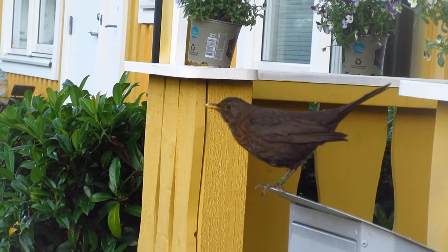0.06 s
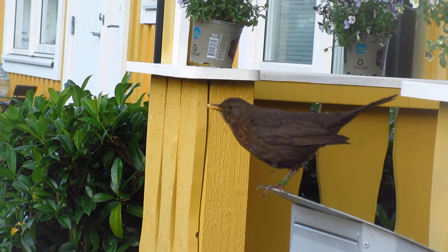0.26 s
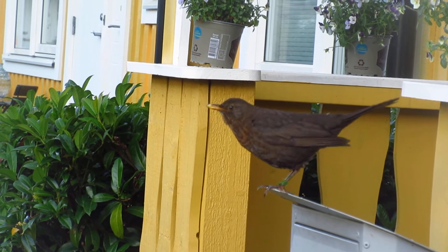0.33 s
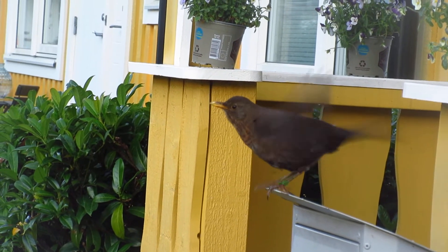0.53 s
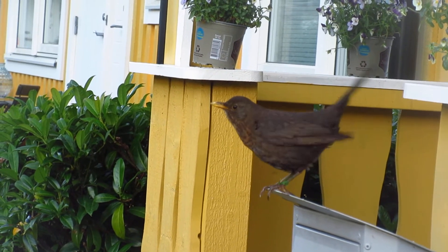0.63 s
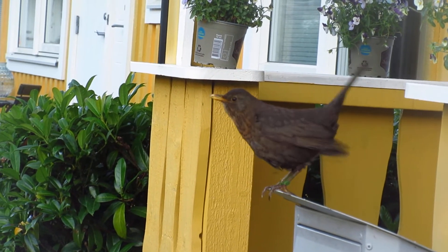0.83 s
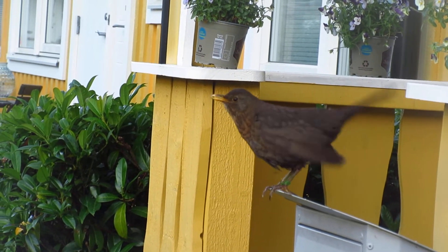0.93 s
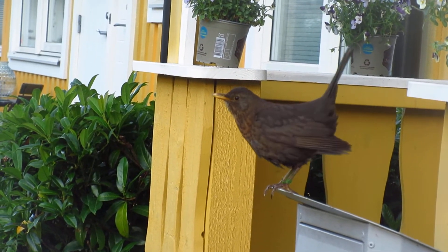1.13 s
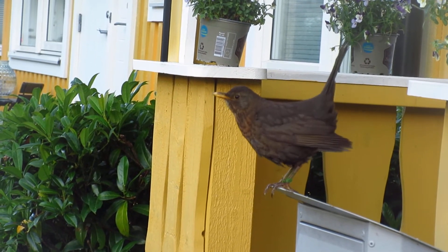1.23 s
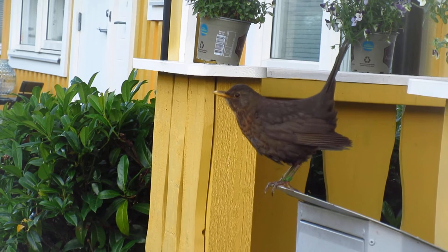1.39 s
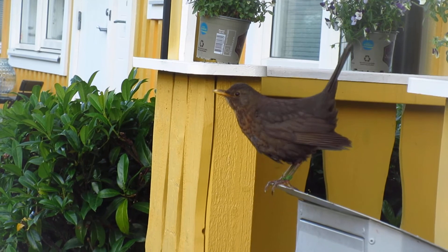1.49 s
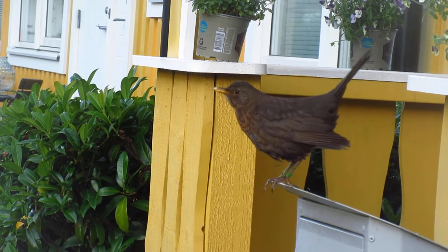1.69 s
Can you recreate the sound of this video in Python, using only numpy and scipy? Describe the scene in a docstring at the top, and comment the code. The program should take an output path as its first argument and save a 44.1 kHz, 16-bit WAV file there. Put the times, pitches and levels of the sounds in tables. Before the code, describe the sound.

A blackbird calls close by over a faint, steady outdoor wash. From about 0.2 to 1.2 seconds it gives nine short, sharp, slightly raspy chucks, loudest near 0.8 seconds, each with a brief echo. A soft, low wing rustle swells beneath them and fades by about 1 second, with a few faint dull bumps scattered through. Near 1.5 seconds a very faint, thin hiss sets in.

```python
"""A faint outdoor wash sounds throughout, and a low rustle swells as a blackbird flicks wings and tail.
From 0.2 s the bird, on a metal box by a wooden porch, gives nine sharp "chuck" calls over dull bumps.
Each is a whistle that flicks up, breaks and plunges with a rasp, all in about 20 ms.
The house front throws it back, then the garden rings on. Near 1.5 s a thin hiss sets in."""
import sys
import numpy as np
from scipy import signal
from scipy.fft import rfft, irfft
from scipy.io import wavfile
from scipy.ndimage import uniform_filter1d

SR = 44100
rng = np.random.default_rng(int(sys.argv[2]) if len(sys.argv) > 2 else 0)


def master_out(mix):
    """Clip the mix to full scale and print it as 16-bit PCM to the path in sys.argv[1]."""
    frames = np.transpose(np.atleast_2d(mix))
    ceiling = np.clip(frames, -1, 1)
    pcm = np.round(ceiling * 32767).astype(np.int16)
    wavfile.write(sys.argv[1], SR, pcm)


N = 77175


def amp(db):
    """The decibel scale: 20 dB is a factor of ten in amplitude."""
    return 10 ** (np.asarray(db) / 20)


def unit(x):
    """Normalisation to an rms of 1."""
    return x / np.sqrt(np.mean(x ** 2) + 1e-20)


def gain_db(spectrum, hz):
    """Interpolation of a frequency response on a logarithmic frequency axis."""
    knots_hz, db = np.transpose(spectrum)
    return np.interp(np.log(hz + 1), np.log(knots_hz + 1), db)


def colour(x, spectrum):
    """Linear filtering: each frequency component is scaled by its own gain."""
    return irfft(rfft(x) * amp(gain_db(spectrum, np.fft.rfftfreq(len(x), 1 / SR))), len(x))


def noise(spectrum):
    """Filtered white noise takes on the spectrum of the filter; its rms is 1."""
    return unit(colour(rng.standard_normal(N), spectrum))


def wander(samples):
    """Two moving averages low-pass white noise into smooth random motion of rms 1."""
    smoothed = uniform_filter1d(rng.standard_normal(N), samples, mode="wrap")
    return unit(uniform_filter1d(smoothed, samples, mode="wrap"))


def outdoor_wash():
    """Stationary noise, strongest below 1.8 kHz, forms the ambient floor."""
    # Each row: frequency in Hz, relative spectral density in dB.
    wash_spectrum = [(20, -39), (40, -7), (65, -1.5), (120, -4), (200, -4), (400, -5.5), (550, -8),
                     (750, -7), (1000, -3.5), (1300, -3.5), (1600, 1), (1850, -13.5), (3000, -15),
                     (4200, -19.5), (4800, -18.5), (5600, -19), (10000, -23.5), (12500, -29), (15000, -34)]
    return amp(-51) * noise(wash_spectrum)


def distant_hiss(centre_hz=4830, width_hz=480, start_s=1.466, rise_s=0.066):
    """Noise confined to a narrow Gaussian band is heard as a thin hiss."""
    band = np.exp(-((np.fft.rfftfreq(N, 1 / SR) - centre_hz) / width_hz) ** 2)
    swell = np.clip((np.arange(N) / SR - start_s) / rise_s, 0, 1)
    return amp(-67.5) * swell * unit(irfft(rfft(rng.standard_normal(N)) * band, N))


def wing_rustle():
    """Amplitude-modulated noise: a soft low rustle while the bird flicks its wings and tail."""
    # Each row: time in seconds, level in dB.
    envelope = [(0, -93), (.2, -58), (.4, -52), (.63, -53.5), (.85, -57), (1.1, -73), (1.4, -68),
                (1.75, -69)]
    # Each row: frequency in Hz, relative spectral density in dB.
    rustle_spectrum = [(30, -31), (90, 6), (150, 8.5), (250, 5.5), (400, 7.5), (600, -11), (1500, 4),
                       (8000, -28)]
    level_db = np.interp(np.arange(N) / SR, *np.transpose(envelope))
    return amp(level_db) * noise(rustle_spectrum)


def dull_bumps(width_s=0.028):
    """Low, wavering tones under Gaussian envelopes have no sharp onset, so they sound dull."""
    # Each row: time of the peak in seconds, mean frequency in Hz, peak level in dB.
    bumps = [(.39, 120.2, -55), (.635, 151, -50.5), (1.042, 129, -50.5), (1.55, 118, -54.5)]
    t = np.arange(N) / SR
    sound = np.zeros(N)
    for peak_s, hz, db in bumps:
        phase = 2 * np.pi * np.cumsum(hz * (1 + 0.114 * wander(samples=400))) / SR
        sound += amp(db) * np.exp(-((t - peak_s) / width_s) ** 2) * np.sin(phase)
    return sound


def echo(delay_s, db):
    """Specular reflection: one delayed impulse, placed between samples by a windowed sinc."""
    offset = np.arange(N) - delay_s * SR
    return amp(db) * np.sinc(offset) * np.exp(-(offset / 10) ** 2)


def blurred_echo(delay_s, db, t60_s=0.024):
    """Scattering spreads a reflection into a short, decaying burst of noise."""
    t = np.arange(N) / SR
    blur = rng.standard_normal(N) * (t > delay_s) * amp(-60 * abs(t - delay_s) / t60_s)
    return amp(db) * blur / np.linalg.norm(blur)


def diffuse_tail(t60_s, delay_s):
    """Reverberation: dense random reflections of energy 1 build after a delay and decay exponentially."""
    t = np.arange(N) / SR
    build_up = np.clip(t / delay_s - 1, 0, 1)
    taps = rng.standard_normal(N) * amp(-60 * t / t60_s) * build_up
    return taps / np.linalg.norm(taps)


def surroundings(source):
    """Convolution with the impulse response of perch, porch, walls and garden gives the reflections."""
    # Crisp echoes off hard walls. Each row: delay in seconds, gain in dB before colouring.
    sharp_echoes = [(.00607, -10.5), (.00941, -6), (.01027, -18.5), (.0156, -12.5), (.01802, -16),
                    (.0279, -15), (.0345, -17), (.0660, -19.5)]
    # Smeared echoes off hedges and rough surfaces. Each row: delay in seconds, gain in dB before colouring.
    blurred_echoes = [(.021, -10), (.043, -30), (0.0626, -20.5)]
    # Colour of all reflections after the first. Each row: frequency in Hz, gain in dB.
    reflection_colour = [(1000, -14.5), (1550, 2), (1850, -7.5), (2100, 1.5), (2330, 1.5), (2550, -0.5),
                         (2800, -4), (3100, -1.5), (5000, -7), (15000, -3.5)]
    # Added colour of the long tail. Each row: frequency in Hz, gain in dB.
    tail_colour = [(1000, -1), (1550, -1), (2050, -5), (2450, 1.5), (2700, 3), (3100, -1), (6000, -3)]
    garden = amp(-12.5) * colour(diffuse_tail(t60_s=0.42, delay_s=0.028), tail_colour)
    porch = amp(-12) * diffuse_tail(t60_s=0.089, delay_s=0.0034)
    sharp = sum(echo(*row) for row in sharp_echoes)
    blurred = sum(blurred_echo(*row) for row in blurred_echoes)
    perch = echo(delay_s=0.002528, db=-5.5)  # the nearest surface doubles every call
    response = perch + colour(garden + porch + sharp + blurred, reflection_colour)
    return signal.fftconvolve(source, response)[:N]


def chuck(top_s, top_hz, db, rise, fall, plunge_s, edge_db):
    """Source and filter: the beak shapes a swept whistle, the throat colours its overtones and rasp."""
    # Response of the beak. Each row: frequency in Hz, gain in dB.
    beak = [(700, -33), (1100, -26), (1500, -12.5), (1900, -8.5), (2350, -2.5), (2900, -6.5), (3400, -11.5)]
    # Overtones of the whistle. Each row: harmonic number, relative level in dB before the throat.
    harmonics = [(2, -29.5), (3, -26), (4, -21.5), (5, -35), (6, -37)]
    # Resonances of the throat. Each row: frequency in Hz, gain in dB.
    throat = [(500, -51), (1500, -11), (2100, 17), (2550, 20), (3000, 6.5), (3500, 3), (3900, 3), (4400, 0),
              (5500, -5.5), (6700, -10.5), (7600, -10), (8700, -27), (9700, -17), (10150, -9.5),
              (10900, -20), (12200, -12.5), (13300, -11), (15000, -13.5)]
    lead_s, attack_s, swell_s, release_s = 0.0092, 0.0004, 0.0042, 0.0053
    break_s, leap_s, landing_hz = 0.0012, 0.00091, 1086
    overtone_rise_s, rasp_rise_s, rasp_decay_s = 0.0057, 0.0018, 0.014
    t = np.arange(N) / SR - top_s  # zero at the top of the sweep, where the note breaks
    live = (t > -lead_s) & (t < plunge_s + release_s)
    t = t[live]

    # The pitch rises cleanly, shudders and overshoots at the break, then falls roughly.
    octaves = np.where(t < 0, rise * t, -fall * t)
    shudder = np.where(t < 0, 0.0031, 0.027) + 0.043 * np.exp(-(t / break_s) ** 2)
    jitter = shudder * wander(samples=14)[live]
    leap = 0.084 * np.exp(-(t / leap_s) ** 2)
    hz = np.maximum(top_hz * 2 ** octaves, landing_hz) * (1 + jitter + leap)
    phase = 2 * np.pi * np.cumsum(hz) / SR

    gate = np.clip((t + lead_s) / attack_s, 0, 1) * np.clip((plunge_s + release_s - t) / release_s, 0, 1)
    soft_start_db = -23.5 * np.clip(1 - (t + lead_s) / swell_s, 0, 1)
    level = amp(soft_start_db + gain_db(beak, hz))
    opening = np.exp(np.minimum(t, 0) / overtone_rise_s)  # overtones open up just before the break
    overtones = level * opening * sum(amp(k_db) * np.sin(k * phase) for k, k_db in harmonics)
    reedy_start = amp(-32) * np.clip(-t / swell_s, 0, 1) ** 2 * np.sin(2 * phase)
    rasp_envelope = np.exp(np.where(t < 0, t / rasp_rise_s, -t / rasp_decay_s))
    rasp = amp(-21) * rasp_envelope * rng.standard_normal(N)[live]

    whistle, edge = np.zeros((2, N))
    whistle[live] = gate * level * np.sin(phase)
    edge[live] = gate * (overtones + reedy_start + rasp)
    return amp(db) * (whistle + amp(edge_db) * colour(edge, throat))


def scene():
    """Superposition: the direct calls, their reflections and the background add in one channel."""
    # Each row: time of the break in seconds, top of the sweep in Hz, gain in dB, rise and fall rates
    # in octaves per second, plunge length in seconds, added gain of overtones and rasp in dB.
    calls = [ (0.2236, 2201, -21, 64, 77, 0.0069, -2.5), (0.386, 2332, -20.5, 70, 81, 0.011, -2),
             (0.4783, 2507, -17, 46, 80.4, 0.01, -1.5), (0.5788, 2719, -15, 64, 103, 0.0098, 2),
             (0.679, 2740, -15, 52, 122, 0.0065, 1.5), (0.7658, 2794, -13, 52, 108, 0.01, 4),
             (0.8867, 2673, -16, 62, 110, .011, 0.5), (1.0171, 2725, -16.5, 70, 97, 0.018, 0.5),
             (1.1557, 2460, -16.5, 60, 92, 0.013, -1.5), ]
    bird = sum(chuck(*row) for row in calls)
    return (bird + surroundings(bird) + outdoor_wash() + wing_rustle() + dull_bumps() + distant_hiss())[None]


def record(dry, cutoff_hz=15120):
    """Band limiting: a linear-phase low-pass filter removes the highest treble."""
    low_pass = signal.firwin(511, cutoff_hz, window=("kaiser", 9), fs=SR)
    return signal.oaconvolve(dry, low_pass[None], "same")


dry = scene()
out = record(dry)
master_out(out)
```